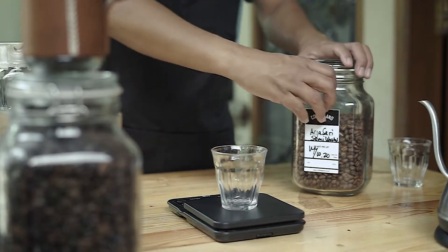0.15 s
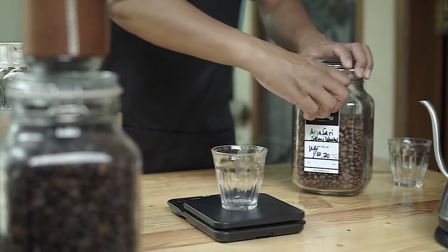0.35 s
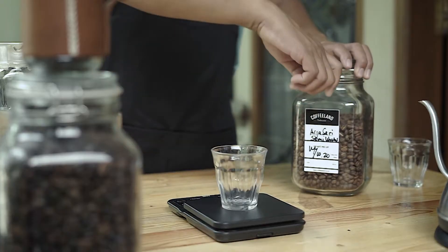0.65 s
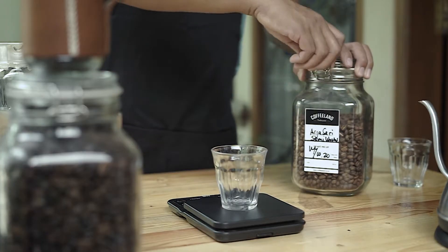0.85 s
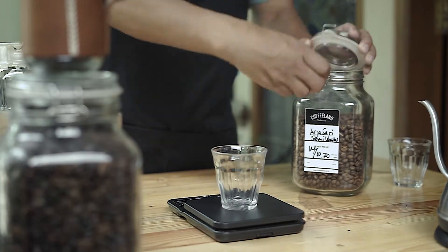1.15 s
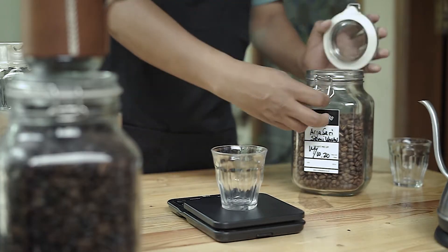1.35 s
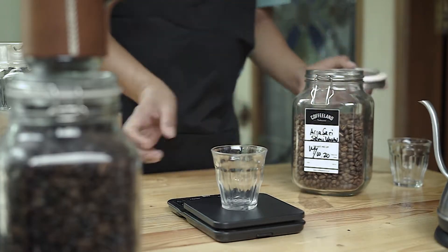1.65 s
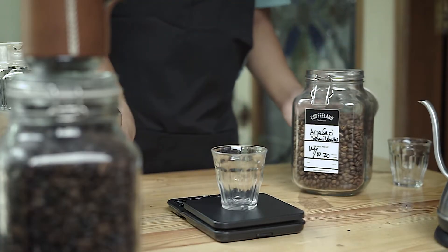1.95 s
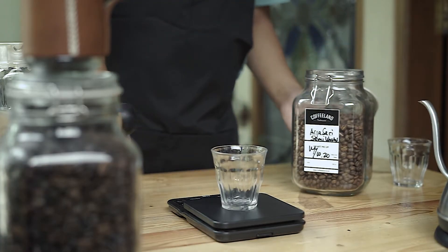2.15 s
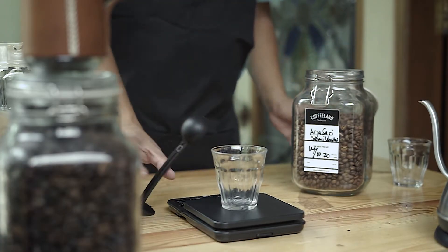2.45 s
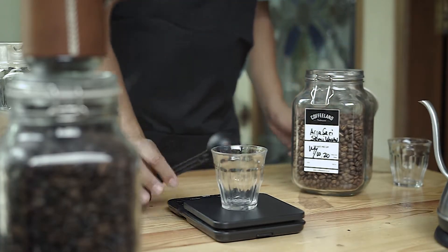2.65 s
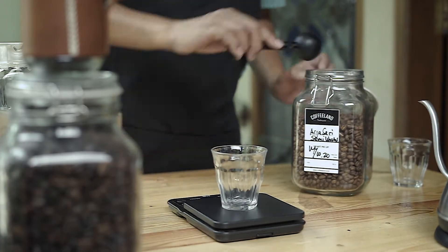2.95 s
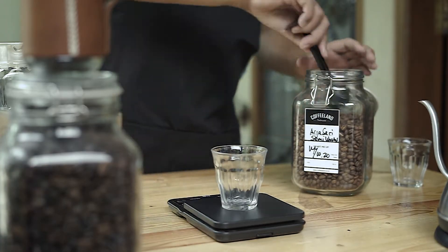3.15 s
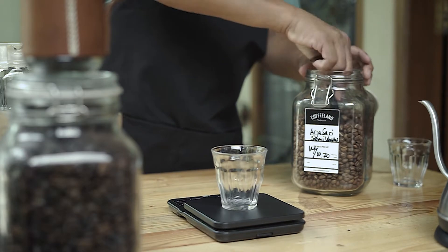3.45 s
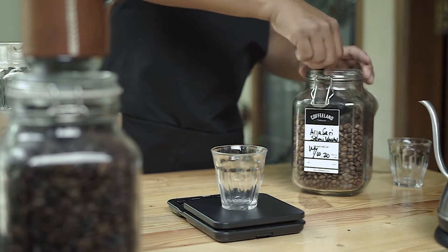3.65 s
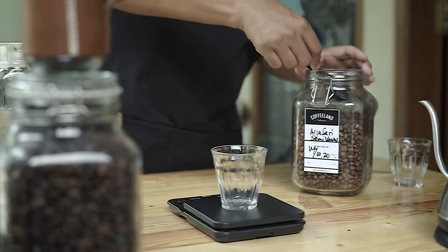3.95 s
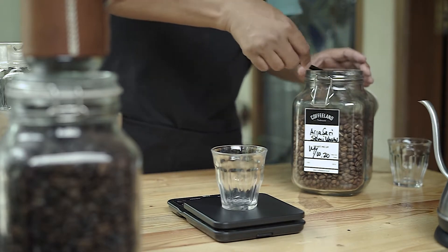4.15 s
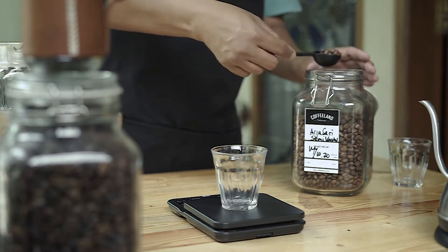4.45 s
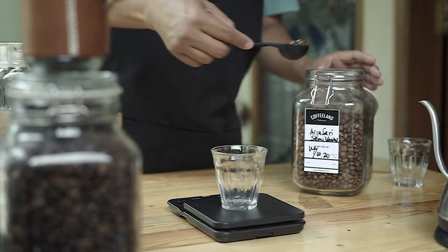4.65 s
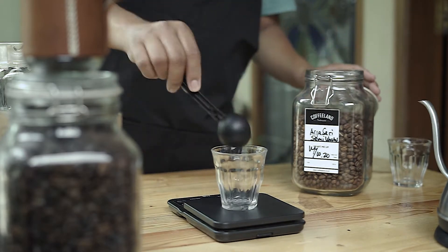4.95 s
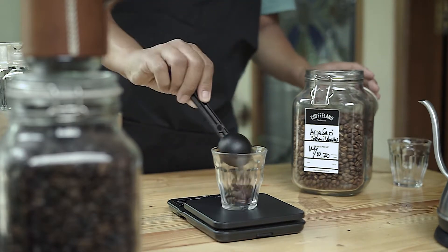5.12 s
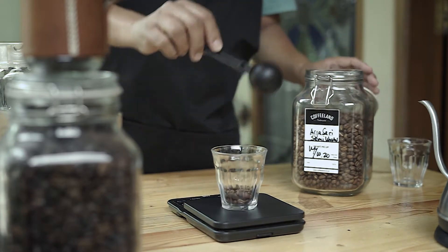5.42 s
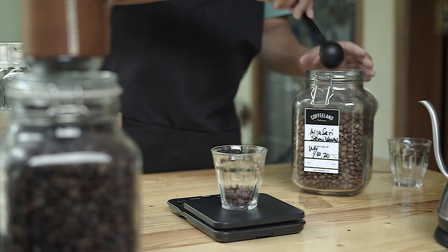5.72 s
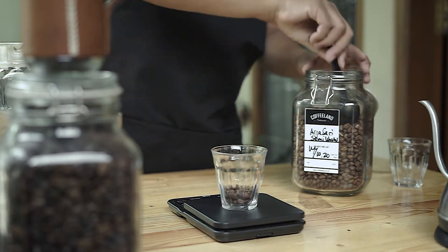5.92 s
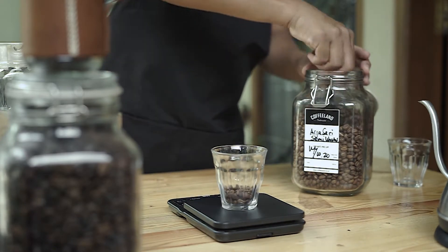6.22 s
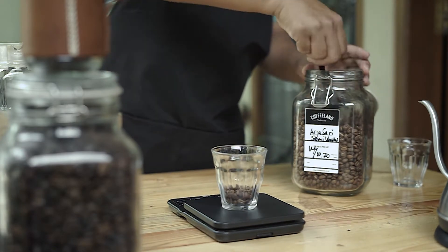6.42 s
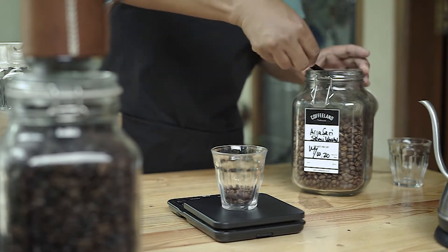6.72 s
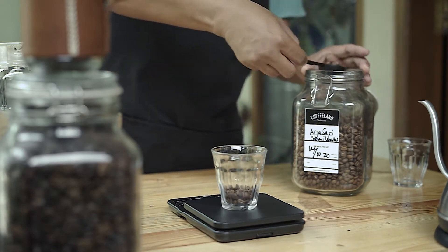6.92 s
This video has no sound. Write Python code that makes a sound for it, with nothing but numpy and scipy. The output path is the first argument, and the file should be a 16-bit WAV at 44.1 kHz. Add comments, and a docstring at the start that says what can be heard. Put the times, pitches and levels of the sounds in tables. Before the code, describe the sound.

A glass jar is unclasped, then coffee beans are scooped and rattle into a glass tumbler, with wind rumble and distant birds.

```python
"""Wind buffets the microphone at an open-air counter, pushing the limiter, and far birds whistle throughout.
A wire clasp is undone and knocks a glass jar, which rings. The glass lid is lifted off and set down
on the wooden counter. A plastic scoop digs into coffee beans, which crunch and click in many tiny
collisions. The beans slide down the scoop and rattle into a glass tumbler, making it ring.
Then the scoop digs again."""
import sys
import numpy as np
from scipy import signal
from scipy.fft import rfft, irfft
from scipy.io import wavfile
from scipy.ndimage import uniform_filter1d, minimum_filter1d

SR = 44100
rng = np.random.default_rng(int(sys.argv[2]) if len(sys.argv) > 2 else 0)


def dump_mix(stems):
    """Bounce the given channels to the path in sys.argv[1] as a 16-bit WAV at rate SR."""
    frames = np.atleast_2d(stems).T  # one column per channel
    limited = np.clip(frames, -1, 1)  # hard clip at full scale
    pcm = np.round(limited * 32767).astype(np.int16)
    wavfile.write(sys.argv[1], SR, pcm)


N = 312228
T = np.arange(N) / SR
HIGHEST_HZ = 15850

# tone colour of beans hitting each other: pitch_hz, level_db
CRUNCH_COLOUR = [(530, -37), (900, -10), (1030, -23), (1190, -14.5), (1350, -12.5), (1830, 0), (2290, 0),
                 (3790, 0), (5240, 5.5), (6430, 2), (7790, 3), (8470, -1.5), (10500, 1), (12400, 0),
                 (15800, -12)]
# ringing tones of the jar: pitch_hz, level_db, ring_s (time to fade by 60 dB)
JAR_TONES = [(333, -11, 0.044), (630, -9, 0.047), (2160, -17.5, 0.22), (2820, 0.5, 0.06), (2900, -5, 0.14),
             (3830, -18, 0.043), (4390, -2, 0.065), (4440, -9.5, 0.055), (5750, -5.5, 0.019),
             (6580, -1, 0.0127), (7400, -5, 0.013), (8600, -6.5, 0.0147), (9800, -12.5, .015),
             (10900, -10, 0.014), (13900, -8, 0.02), (14140, -19, .03)]
# ringing tones of the tumbler: pitch_hz, level_db, ring_s
TUMBLER_TONES = [(960, -11, .05), (2669, 0, .16), (3800, -14, .1), (6546, 0, .14), (11100, -1, .015),
                 (12443, 3, .12), (12476, 5, .14), (14112, -4, .08)]


def scoop_digs(mix):
    """Beans crunch in the jar while the push of the scoop shakes the counter."""
    # one list for each dig: time_s, level_db, tilt_db_per_octave (higher is brighter), push_db
    digs = [
        [(3.252, -32, 2, -36), (3.264, -18.5, 0, -33), (3.304, -17, -3, -27), (3.35, -23.5, -4, -30.5),
         (3.396, -17, -3.5, -28.5), (3.428, -31, -3, -28), (3.492, -35, -7, -37), (3.6, -21, -2.5, -37.5),
         (3.68, -28, -0.5, -37), (3.806, -28, -.6, -37.5), (3.85, -20, -2.1, -33.5), (4.03, -43.5, -3, -48)],
        [(5.991, -30, -6, -37), (6.007, -21, -4.5, -35.5), (6.097, -15.5, -3, -25), (6.163, -36, -6.5, -34.5),
         (6.22, -21.5, -5, -31.5), (6.325, -17.5, -1.5, -34), (6.39, -23, 0.3, -33), (6.52, -23.5, 0, -37),
         (6.78, -41, -3, -42.5), (6.835, -29, -7, -28.5), (6.89, -42, -1, -42)],
    ]
    # low rumble of the counter: pitch_hz, level_db
    push_colour = [(35, -45), (55, -35), (72, 5.5), (97, -6), (246, -8.5), (328, -3.5), (400, -14.5),
                   (1000, -17.5), (1300, -38)]
    echo_samples = 17  # time for sound to cross the jar
    for rows in digs:
        start_s, (level_db, tilt_db, push_db) = curves(rows)
        crunch = collisions(CRUNCH_COLOUR, tilt_db, per_s=14000, spread_db=-3, ring_s=.002, clump_db=1.14)
        # echoes between the walls ring on evenly spaced pitches
        crunch = signal.lfilter([1], np.r_[1, np.zeros(echo_samples - 1), -.2], gain_of(level_db) * crunch)
        push = gain_of(push_db) * noise(push_colour, len(push_db))
        add(mix, start_s, (crunch + push) * signal.windows.tukey(len(push), .005))


def bean_clicks(mix):
    """Single beans click in the jar: a snap, a brief ring and a dull knock on the glass wall."""
    # one bean a row: start_s, level_db, pitch_hz, tilt_db_per_octave
    clicks = [(3.256, -8.5, 6330, -4), (3.293, 1, 6300, 18), (3.352, -21, 6020, -7), (3.3953, -6, 6740, 10),
              (3.819, -4, 5800, -2), (3.8508, -3.5, 7200, 7), (3.8607, -2, 5900, -3.5),
              (3.8916, -2.5, 10200, 8), (3.961, -19, 9260, 17), (4.012, -16, 7850, 11),
              (4.08, -17, 5500, -1), (4.0907, -15, 5900, 2), (4.128, -20, 6000, -1), (4.17, -25, 5800, 6),
              (4.2158, -19.5, 5640, 6), (4.2565, -14.5, 14200, 14), (4.2783, -15, 12200, 10.1),
              (4.321, -22.5, 10200, 13), (4.4044, -29, 5530, 8), (5.9974, -8, 10500, 8),
              (6.5929, -20.1, 7640, 12), (6.633, -9, 7700, 15), (6.678, -7.5, 7600, 1.5),
              (6.695, -12, 12300, -2.1), (6.7386, -20.1, 13100, 7), (6.755, -10, 7760, -1.5),
              (6.7838, -15, 12600, 8), (6.8253, -8, 9900, 3), (6.8705, -13, 13000, 3),
              (6.902, -4, 7650, 3.5), (6.9665, -26, 5530, 10.1), (7.011, -17.5, 12700, -1)]
    t = np.arange(1500) / SR
    for start_s, level_db, pitch_hz, tilt_db in clicks:
        colour = [(hz, db + tilt_db * np.log2(hz / 5000)) for hz, db in CRUNCH_COLOUR]
        snap = noise(colour, len(t)) * fade(t, .018) * (1 - np.exp(-t / .0004)) / 1.8
        ring = sine(pitch_hz, t) * fade(t, .008)
        wall = sum(gain_of(db) * sine(hz * rng.uniform(.783, 1.3), t) * fade(t, .014)
                   for hz, db, _ in JAR_TONES if 2000 < hz < 3500)
        wall *= gain_of(-13 - tilt_db)  # duller clicks have more knock
        add(mix, start_s, gain_of(level_db) * (.63 * snap + .37 * ring + wall))


def bean_pour(mix):
    """Falling beans rattle on one another, and their taps keep the tumbler ringing."""
    # the stream of beans: time_s, rattle_db, low_ring_db
    stream = [(5.026, -24.5, -39), (5.047, -21, -25), (5.072, -42, -38), (5.08, -17.5, -28),
              (5.12, -19.5, -30.5), (5.19, -18.5, -24), (5.265, -32.5, -25), (5.32, -49, -40),
              (5.36, -53, -63), (5.42, -63, -69)]
    # tone colour of the rattle: pitch_hz, level_db
    rattle_colour = [(700, -30), (960, -12.5), (2000, -23), (4000, -10.5), (8700, -8.5), (11000, -5),
                     (12800, 0.5), (15800, -12)]
    start_s, (rattle_db, low_ring_db) = curves(stream)
    t = np.arange(SR // 2) / SR
    elapsed_s = np.arange(len(rattle_db)) / SR
    taps_per_s, tapping_s = 130, .2
    tilt_db = -4.5 + 21.5 * elapsed_s  # the rattle gets brighter
    high_ring_db = rattle_db - 4 - 25 * elapsed_s
    out = collisions(rattle_colour, tilt_db, per_s=12000, spread_db=1.5, ring_s=.0016, clump_db=1.2)
    out *= gain_of(rattle_db)
    for hz, db, ring_s in TUMBLER_TONES:
        taps = rng.standard_normal(len(out)) * (rng.random(len(out)) < taps_per_s / SR)
        taps *= elapsed_s < tapping_s
        taps[0] = 1  # the first bean
        ring = signal.oaconvolve(taps, sine(hz, t) * fade(t, ring_s))[:len(out)]
        if hz < 2000:  # the hollow of the glass sounds only along with the rattle
            out += gain_of(db + rattle_db - 12) * unit_level(ring)
        else:  # even out the taps, so the stream sets the loudness
            ring /= np.sqrt(abs(uniform_filter1d(ring ** 2, size=600)) + 1e-7)
            out += gain_of(db + (low_ring_db if hz < 3000 else high_ring_db)) * ring
    add(mix, start_s, out)


def tumbler_clinks(mix):
    """Single beans hit the tumbler and make it ring."""
    # one bean a row: start_s, level_db, tilt_db_per_octave, low_boost_db
    clinks = [(5.026, 3.5, 21, 6), (5.0429, -2, 6, 3), (5.0564, -9, -2, 3), (5.0759, -15.5, 6, -5),
              (5.0914, -13, 7, -5), (5.115, 1.1, 3, -8), (5.1294, -15, 6, .1), (5.14, 8, .1, -16),
              (5.1523, 7, 2, -33), (5.1662, 5, -2, -16)]
    strike(mix, clinks, TUMBLER_TONES, ring_scale=.45, crack=.5, crack_per_db=-.005, crack_s=.014,
           scatter_db=4)


def clasp_knocks(mix):
    """The wire clasp and the lid knock against the glass jar."""
    # one knock a row: start_s, level_db, tilt_db_per_octave, low_boost_db
    knocks = [(.5625, 4.5, -3, -3.5), (.5914, -10, -8.5, -3), (.658, -16, -2.8, -1), (.6983, -19.5, 1, 4),
              (.7654, -5, 6.5, 5), (.7767, -18.5, -4, 7), (.8652, -4.5, 4.5, 6), (.882, 1, 7.5, 17),
              (.8884, -3.5, 12.5, -1), (.9124, -17, -2, 5), (.9986, -22, -4.5, -4), (1.053, -14, 9, 13.5),
              (1.082, -16.5, -1, 1), (1.1234, -22, -2, -1), (1.175, -23, -3, -3), (1.2139, -24, -6, -5),
              (1.2421, -22, -2.1, 1), (1.2907, -21, -5.2, -6), (1.3643, -5, 5.5, 10.5), (1.3716, 2, 3.5, 3)]
    strike(mix, knocks, JAR_TONES, ring_scale=.5, crack=.6, crack_per_db=-.006, crack_s=.035)


def counter_knocks(mix):
    """The lid and the scoop knock on the wooden counter."""
    # one knock a row: start_s, level_db, tilt_db_per_octave
    knocks = [(1.9423, 8.5, 1.7), (1.9495, 1, -1.5), (1.9555, -13, 9), (1.974, -14, 13), (2.222, -12, -9.5),
              (2.236, -22.5, -9.5), (2.25, -17, -18), (2.322, -12, -12), (2.345, -19, -10),
              (2.583, -20.5, -2.5), (2.598, -21, 12)]
    # ringing tones of a knock on the counter: pitch_hz, level_db, ring_s
    tones = [(300, -5, 0.13), (364, 1.5, 0.049), (754, -0.5, 0.081), (1100, -5.5, 0.063), (1506, -1, 0.096),
             (1910, -2, 0.06), (2150, 1.5, 0.024), (2750, 6, 0.092), (2685, 16.5, 0.029), (3050, -4, 0.045),
             (5640, -19, 0.0094), (6400, -14.5, 0.01), (8000, -28, .012)]
    strike(mix, knocks, tones, ring_scale=.75, crack=.45, crack_per_db=.004, crack_s=.06)


def sliding(mix):
    """Many tiny slips blend into a scrape."""
    # the wire off its catch, then beans down the scoop: time_s, level_db, tilt_db_per_octave
    slides = [
        [(.565, -26, -5), (.6, -31, 3), (.636, -25, 6.5), (.642, -50, -11)],
        [(4.92, -48, 2), (4.935, -30, 11.5), (4.96, -61, -6), (4.99, -46, 11), (5.026, -25.5, 6)],
    ]
    # tone colour of the scrape: pitch_hz, level_db
    colour = [(150, -40), (300, -4), (700, 0), (1500, -5.5), (2750, 9), (4000, -18), (8000, -15),
              (9500, -20), (15800, -35)]
    for rows in slides:
        start_s, (level_db, tilt_db) = curves(rows)
        slips = collisions(colour, tilt_db, per_s=21000, spread_db=3.5, ring_s=.00039, clump_db=-9.5)
        add(mix, start_s, gain_of(level_db) * slips)


def wind():
    """Wind shakes the microphone with a slow rumble, a faster flutter and a few hard gusts."""
    # strength of the wind: time_s, rumble_db, flutter_db
    strength = [(0.0, -22, -30), (0.08, -7, -29), (0.14, -11.5, -13), (0.63, -7.5, -7), (0.71, -6.5, -28),
                (0.77, -17, -25), (0.89, -18.5, -28.5), (0.95, -26, -37.5), (1.32, -23, -32),
                (1.67, -38, -29.5), (1.75, -19, -23.5), (1.93, -19.5, -48), (1.97, -11.5, -21.5),
                (2.21, -36.5, -40), (2.58, -48, -49), (3.23, -16, -38), (3.75, -56, -38.5),
                (4.02, -17.5, -31), (4.06, -19.5, -36), (4.45, -37, -44), (6.96, -43.5, -43.5),
                (7.08, -45, -30)]
    # tone colours of the rumble and the flutter: pitch_hz, level_db
    rumble_colour = [(4, -32), (8, 7), (15, 6), (26, -3.5), (34, -37.5), (60, -86), (400, -150)]
    flutter_colour = [(20, -73), (35, -3), (50, -6), (70, -17), (185, -38), (400, -50.5), (800, -54),
                      (4000, -150)]
    # gusts strong enough to overload: start_s, peak_db
    gusts = [(.166, 10.5), (.264, 11), (.315, 12), (.485, 15), (.509, 17), (.525, 1), (.642, 10.5)]
    time_s, rumble_db, flutter_db = np.transpose(strength)
    out = np.zeros(N)
    for db, colour in ((rumble_db, rumble_colour), (flutter_db, flutter_colour)):
        out += gain_of(np.interp(T, time_s, db)) * steady_level(noise(colour), samples=3500)
    bump = np.hanning(round(.0214 * SR))
    for k, (start_s, peak_db) in enumerate(gusts):
        add(out, start_s, (-1) ** k * gain_of(peak_db) * bump)  # push and pull in turn
    return out


def bird_whistles():
    """Each far call is a nearly pure tone that slides up to its pitch, trembles and dies away."""
    # one call a row: start_s, length_s, pitch_hz, glide_hz, level_db, tremble (share of the pitch)
    calls = [(.04, 0.12, 4190, -50, -46, 0.014), (.21, 0.058, 3680, 13, -40, 0.014),
             (0.39, 0.097, 4630, 1, -46, 0.011), (.7, 0.089, 3920, 5, -38.5, .01),
             (.77, 0.16, 3370, 8, -40.5, .006), (.94, 0.237, 3730, 77, -45, 0.0102),
             (1.25, 0.16, 3700, 0, -43, 0.0087), (1.85, 0.15, 4200, -58, -46, 0.011),
             (2.06, 0.3, 3767, -40, -51.5, .008), (2.1, 0.17, 4802, 2, -48, 0.0087),
             (2.535, 0.09, 4130, 67, -31, 0.017), (2.63, 0.21, 4300, 6, -39.5, 0.028),
             (3.055, 0.11, 4192, -120, -32.5, 0.012), (3.145, 0.11, 4830, -30, -34.5, 0.017),
             (4.065, 0.2, 4760, -400, -29, 0.028), (4.475, 0.11, 3666, -12, -37.5, 0.0078),
             (4.725, 0.13, 3600, 152, -36, 0.021), (4.83, 0.34, 4580, -33, -44, 0.022),
             (5.14, 0.18, 4120, -150, -33, 0.025), (5.46, 0.17, 4000, -1, -46.5, 0.0067),
             (5.66, 0.15, 3550, 117, -32.5, 0.017), (5.75, 0.55, 4780, -100, -36, 0.0234),
             (5.95, .05, 3746, 5, -41, .01), (6.6, 0.23, 4950, 10, -31, .055),
             (6.78, .17, 4053, 4, -41, 0.0047)]
    rise_s, fall_db = .032, 16.5
    out = np.zeros(N)
    for start_s, length_s, pitch_hz, glide_hz, level_db, tremble in calls:
        t = np.arange(0, length_s, 1 / SR)
        bend = 1 - .0296 * np.exp(-t / .0199) + tremble * wander(len(t), samples=60)
        cycles = np.cumsum((pitch_hz + glide_hz * t / length_s) * bend) / SR
        loudness = np.minimum(t / rise_s, 1) * gain_of(level_db - fall_db * t / length_s)
        loudness *= signal.windows.tukey(len(t), .1)
        add(out, start_s, loudness * np.sqrt(2) * np.sin(2 * np.pi * cycles))
    return out


def outdoor_air():
    """Steady air that wavers a little, and a far, high rustle."""
    # tone colour of the air: pitch_hz, level_db
    air_colour = [(35, -73), (60, -7), (118, -11), (232, -11.5), (388, -16), (425, -18.5), (489, -20),
                  (919, -25.5), (3020, -31.5), (3640, -29.5), (3900, -26.5), (5280, -27.5), (7490, -37),
                  (15800, -47.5)]
    # strength of the rustle: time_s, level_db
    rustle_levels = [(0, -44), (.3, -44), (1.6, -68), (1.85, -50), (2.24, -50), (2.28, -37), (2.42, -40),
                     (2.5, -61), (3.2, -41), (4.3, -42), (4.5, -67), (4.85, -37.5), (5.5, -50), (6.6, -40),
                     (7.08, -41)]
    air = gain_of(-37 + 1.25 * wander(N, samples=2000)) * noise(air_colour)
    rustle = noise([(2500, -14), (3500, -6), (5200, -6.5), (6500, -19), (8000, -25), (10000, -91)])
    return air + gain_of(np.interp(T, *np.transpose(rustle_levels))) * rustle


def echoes(sound):
    """Many small reflections blur into a tail in which each pitch fades at its own speed."""
    # length of the tail: pitch_hz, ring_s
    ring_times = [(300, 0.84), (2000, 0.4), (6000, 0.42), (10000, 0.32), (15000, 0.091)]
    taps = np.zeros(SR // 2)
    slots = np.arange(260, len(taps) - 20, 20)
    taps[slots + rng.integers(0, 20, len(slots))] = rng.choice([-1., 1.], len(slots))
    hz, t, bands = signal.stft(taps, SR, nperseg=256)
    tail = signal.istft(bands * fade(t, at_pitch(ring_times, hz)[:, None]), SR, nperseg=256)[1]
    return signal.oaconvolve(sound, tail / np.linalg.norm(tail))[:N]


def strike(mix, hits, tones, ring_scale, crack, crack_per_db, crack_s, scatter_db=2.5):
    """Each hit rings an object's tones under a burst of noise; crack is the noise's share at 0 dB."""
    hz, tone_db, ring_s = np.transpose(tones)[:, :, None]
    t = np.arange(SR // 3) / SR
    for start_s, level_db, tilt_db, *low_boost_db in hits:
        # where the hit lands decides how strongly each tone rings
        spot_db = tone_db + tilt_db * np.log2(hz / 2700) + sum(low_boost_db) * (hz < 4600)
        strengths = gain_of(spot_db + scatter_db * rng.standard_normal(hz.shape))
        rings = strengths * fade(t, ring_s * ring_scale) * sine(hz, t)
        rough_contact = np.r_[1, .12 * rng.standard_normal(399)] * fade(t[:400], .013)
        ring = signal.oaconvolve(rings.sum(0), rough_contact)[:len(t)]
        weak_bass = [hz[0, 0] / 2, spot_db[0, 0] - 12]  # small things give off little bass
        colour = np.vstack([weak_bass, np.hstack([hz, spot_db])])
        snap = noise(colour, len(t)) * fade(t, crack_s) * (1 - np.exp(-t / .0012))
        share = np.clip(crack + crack_per_db * level_db, 0, 1)
        hit = (1 - share) * ring / abs(ring).max() + share * snap / abs(snap).max()
        add(mix, start_s, gain_of(level_db) * hit)


def collisions(colour, tilt_db, per_s, spread_db, ring_s, clump_db, pitches=56):
    """Many tiny hits of random strength, each a few dying cycles at its own pitch."""
    size = len(tilt_db)
    out = np.zeros(size)
    clumps = gain_of(clump_db * wander(size, samples=200))  # beans give way in bunches
    t = np.arange(600) / SR
    for hz in np.geomspace(colour[1][0], HIGHEST_HZ, pitches):
        ping = sine(hz, t) * (1 - np.exp(-t * hz)) * np.exp(-t / (ring_s * np.sqrt(5000 / hz)))
        strengths = gain_of(spread_db * np.minimum(rng.exponential(1, size), 4))
        hits = strengths * (rng.random(size) < per_s / pitches / SR)
        gain = gain_of(at_pitch(colour, hz) + tilt_db * np.log2(hz / 5000)) * np.sqrt(hz)
        out += signal.oaconvolve(hits * gain * clumps, ping / np.linalg.norm(ping))[:size]
    return steady_level(out, samples=2500)


def gain_of(db):
    """Turns decibels into a multiplier."""
    return 10 ** (np.asarray(db) / 20)


def sine(hz, t):
    """A pure tone."""
    return np.sin(2 * np.pi * hz * t)


def fade(t, ring_s):
    """Falls by 60 dB in ring_s seconds."""
    return gain_of(-60 * t / ring_s)


def unit_level(x):
    """Scales to an average (rms) level of 1."""
    return x / np.sqrt(np.mean(x ** 2) + 1e-20)


def steady_level(x, samples):
    """Holds the level near 1 over each stretch of samples."""
    return x / np.sqrt(uniform_filter1d(x ** 2, samples) + 1e-20)


def at_pitch(points, hz):
    """Looks up a value between listed pitches."""
    pitches, values = np.transpose(points)
    return np.interp(np.log(hz + 1), np.log(pitches + 1), values)


def noise(colour, size=N):
    """Noise of level 1, shaped by rows of pitch_hz, level_db."""
    gains = gain_of(at_pitch(colour, np.fft.rfftfreq(size, 1 / SR)))
    return unit_level(irfft(rfft(rng.standard_normal(size)) * gains, size))


def wander(size, samples):
    """A smooth random drift of level 1."""
    return unit_level(uniform_filter1d(uniform_filter1d(rng.standard_normal(size), samples), samples))


def curves(rows):
    """Gives the start time and a curve through each later column."""
    time_s, *columns = np.transpose(rows)
    t = np.arange(time_s[0], time_s[-1], 1 / SR)
    return time_s[0], [np.interp(t, time_s, column) for column in columns]


def add(mix, start_s, sound):
    """Mixes a sound in at start_s."""
    part = mix[round(start_s * SR):][:len(sound)]
    part += sound[:len(part)]


def scene():
    """Near sounds with some echo, far birds with more, then air and wind."""
    near = np.zeros(N)
    for source in (clasp_knocks, counter_knocks, tumbler_clinks, bean_clicks, scoop_digs, sliding,
                   bean_pour):
        source(near)
    birds = bird_whistles()
    mix = near + gain_of(-10) * echoes(near)
    mix += gain_of(3.5) * birds + gain_of(-4.5) * echoes(birds)
    return (mix + outdoor_air() + wind())[None]


def record(dry):
    """A limiter turns the level down just ahead of too-loud peaks; the highest treble is cut off."""
    excess_db = np.maximum(20 * np.log10(abs(dry[0]) + 1e-9), 0)
    recovery_db = 400 * T  # the level comes back at 400 dB a second
    dip_db = np.maximum.accumulate(excess_db + recovery_db) - recovery_db
    dip_db = uniform_filter1d(-minimum_filter1d(-dip_db, size=201), size=201)  # look ahead and smooth
    treble_cut = signal.firwin(511, HIGHEST_HZ, window=("kaiser", 9), fs=SR)
    return np.clip(signal.oaconvolve(dry / gain_of(dip_db), treble_cut[None], "same"), -1, 1)


dry = scene()
out = record(dry)
dump_mix(out)
```